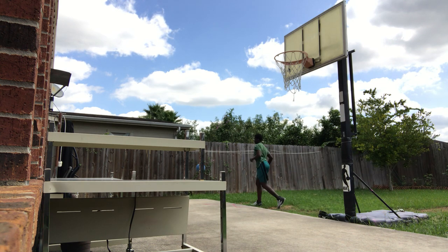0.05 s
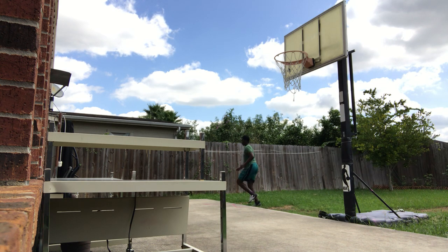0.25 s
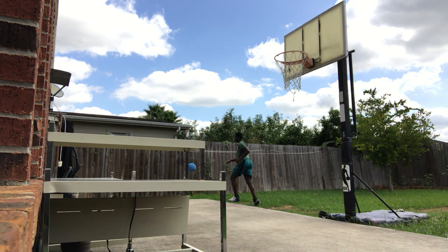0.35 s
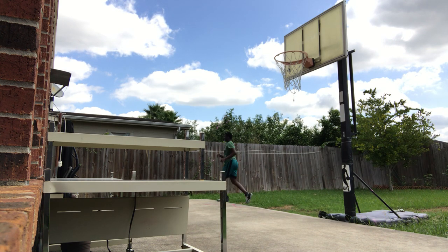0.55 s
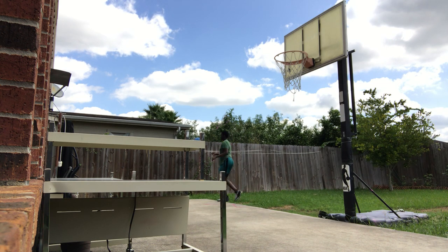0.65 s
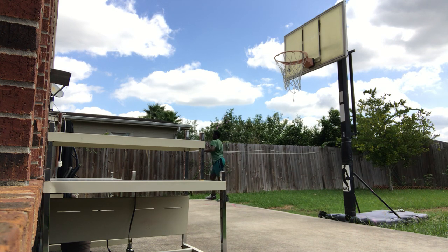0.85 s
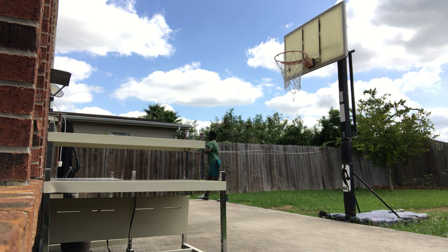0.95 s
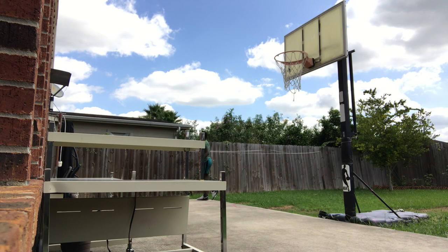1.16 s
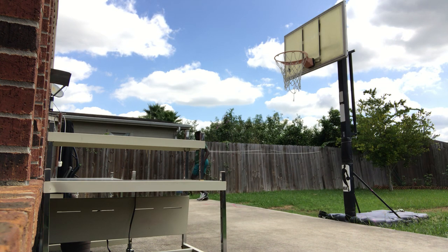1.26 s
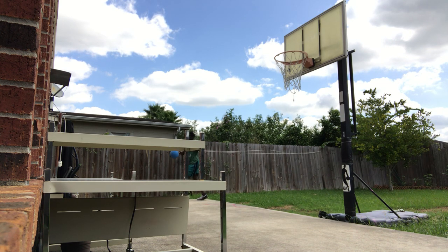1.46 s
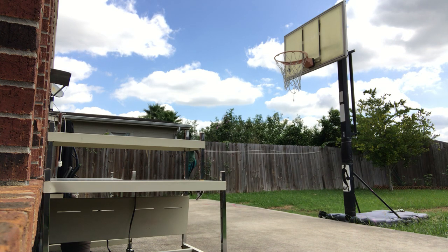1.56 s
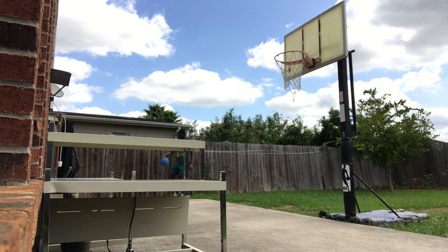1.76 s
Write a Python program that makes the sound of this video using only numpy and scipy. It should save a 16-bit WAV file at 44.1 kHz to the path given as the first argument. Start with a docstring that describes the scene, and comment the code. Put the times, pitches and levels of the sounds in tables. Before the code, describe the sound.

Some metres away in a backyard, a basketball hits concrete twice, about a second apart, echoing briefly off house and fence. The second bounce is duller. Faint shoe and hand taps follow each, while a distant engine hums.

```python
"""A concrete backyard court, one microphone some metres from a basketball that is dribbled twice.
A shoe scuffs, then at 0.25 s the ball lands: a sharp slap, a low thump and a short ring of the air
inside, thrown back by house and fence. Shoes and hands tap and scuff faintly and a thin metallic ring
lingers. The second, duller bounce comes at 1.27 s, followed by a few more taps. All the while, far
off, an engine slowly speeds up and an insect buzzes over the rumble of the neighbourhood."""
import sys
import numpy as np
from scipy import signal
from scipy.fft import rfft, irfft
from scipy.io import wavfile

SR = 44100
rng = np.random.default_rng(int(sys.argv[2]) if len(sys.argv) > 2 else 0)


def file_out(sig):
    """Save sig as 16-bit WAV at sys.argv[1]."""
    # one column per channel
    cols = np.atleast_2d(sig).T
    # limit, then scale
    lim = np.clip(cols, -1, 1)
    pcm = np.round(lim * 32767).astype(np.int16)
    wavfile.write(sys.argv[1], SR, pcm)


N = 79380
T = np.arange(N) / SR
HZ = np.fft.rfftfreq(N, 1 / SR)


# The ball landing, some metres off (time [s], slap [dB], push [dB], thump [dB], thump pitch [ratio],
# thump tilt [dB/octave], treble tilt [dB/octave], ring [dB], yard [dB], fence echo [dB])
BALL_BOUNCES = [(0.2468, -1, -26.5, -2, 1.015, 5, 1.5, -9.5, 2.5, -2),
                (1.2704, 0.5, -12, -1.6, .993, -1, -9.5, -12.5, 2, 0)]
def bounce(s, slap_db, push_db, thump_db, pitch, tilt_db, treble_db, ring_db, yard_db, fence_db):
    """The ball slaps, pushes air, thumps and rings; walls and yard answer."""
    slap = amp(slap_db) * rubber_slap()
    thump = amp(thump_db) * ball_thump(pitch, tilt_db)
    direct = slap + amp(push_db) * air_push() + thump + amp(ring_db) * air_ring()
    reflected = wall_echoes(slap, thump, fence_db) + amp(yard_db) * (near_scatter() + yard_tail())
    colour = hollow_colour() + treble_db * octaves(4130, 6060)
    return late(through(direct + reflected, causal(colour)), s)


# Spectrum of rubber hitting concrete (frequency [Hz], level [dB])
SLAP_COLOUR = [(60, 2.5), (400, 6), (800, -15.5), (1400, 3), (2500, 6), (3000, 3.5), (4300, -2.5),
               (5300, 2), (7000, -4), (9000, -16), (12500, -19.5), (16000, -35)]
# Modes of the rubber skin (frequency [Hz], level [dB], t60 [s])
SKIN_MODES = [(1534, -26, 0.015), (2450, -19.5, 0.0025), (5340, -18.5, 0.0043)]
def rubber_slap():
    """Rubber strikes concrete with a click, and the skin rings briefly."""
    click = through(signal.unit_impulse(N), causal(read(SLAP_COLOUR)))
    return skin_flex(click + sum(mode(*row) for row in SKIN_MODES))


# Bands the flexing skin delays (frequency [Hz], width [Hz])
FLEX_BANDS = [(2300, 2100), (5300, 7700), (10000, 4900)]
def skin_flex(x):
    """The flexing skin smears the slap in time; all-pass filters leave its spectrum's level alone."""
    for hz, width in FLEX_BANDS:
        radius = np.exp(-np.pi * width / SR)
        poles = np.array([1, -2 * radius * np.cos(2 * np.pi * hz / SR), radius * radius])
        x = signal.lfilter(poles[::-1], poles, x)
    return x


def air_push(length_s=0.01058, hz=204.9):
    """The flattening ball pushes out one short pulse of air."""
    window = (T < length_s) * np.sin(np.pi * T / length_s) ** 2
    return window * np.cos(2 * np.pi * hz * (T - length_s / 2))


# Low modes of the thump (frequency [Hz], level [dB], t60 [s])
THUMP_MODES = [(70.2, -34, 0.59), (103.75, -5.5, 0.089), (185.5, -9.5, 0.068), (222.6, -14.5, .15),
               (289.7, -7, 0.036), (378, -31, 0.1), (433.3, -31.5, 0.12), (538, -38, .1),
               (662, -26.5, 0.022)]
def ball_thump(pitch, tilt_db, rise_s=0.013):
    """Low modes of alternating sign swell and die, their levels tilted about the second mode."""
    pivot_hz = THUMP_MODES[1][0]
    modes = sum((-1) ** k * mode(hz * pitch, db + tilt_db * np.log2(hz / pivot_hz), t60)
                for k, (hz, db, t60) in enumerate(THUMP_MODES))
    return modes * (1 - np.exp(-T / rise_s))


# Modes of the air in the ball (frequency [Hz], level [dB], t60 [s])
CAVITY_MODES = [(957, -33.5, 0.18), (1055, -36, 0.31), (1142, -30, .22), (1288, -37.5, 0.28),
                (1353, -32, 0.21), (1428, -41.5, 0.62), (1558, -39.5, 0.24), (1872, -35, 0.27),
                (2000, -59, 0.18), (2170, -43, .33), (2336, -36, 0.26), (2432, -29.5, 0.18),
                (2720, -48, 0.22)]
def air_ring():
    """The enclosed air rings after the blow, its modes alternating in sign by pairs."""
    return sum((-1) ** (k // 2) * mode(*row) for k, row in enumerate(CAVITY_MODES))


# Peaks and dips of the ball (frequency [Hz], width [Hz], gain [dB])
HOLLOW_BANDS = [(513, 52, 1), (820, 180, -5.5), (1003, 160, 3.5), (1240, 42, -9), (1367, 120, 6.5),
                (2480, 390, 1.5), (2850, 84, -7.5)]
def hollow_colour():
    """The ball's hollow colour in dB, heard in the direct sound and all its reflections."""
    return sum(db / (1 + (2 * (HZ - hz) / width) ** 2) for hz, width, db in HOLLOW_BANDS)


# Reflections reaching the microphone (delay [s], slap level [dB], thump level [dB])
WALL_ECHOES = [(.0018, -10.5, -46), (.0061, -31, -4.5), (0.011, -18, -24), (.0269, -18, -17.5),
               (.0343, -15.5, -15.5), (.0788, -21, -24.5), (.1012, -22.5, -28), (.1112, -32, -42),
               (.1257, -26, -27), (.1542, -38, -29.5), (.2343, -45, -29)]
def wall_echoes(slap, thump, fence_db, dull_hz=5500, fence_after_s=.06):
    """Ground, house and, later, the fence throw back the thump and a dulled slap."""
    dull = through(slap, causal(-10 * np.log10(1 + (HZ / dull_hz) ** 2)))
    return sum(late(amp(slap_db + fence_db * (delay > fence_after_s)) * dull + amp(low_db) * thump, delay)
               for delay, slap_db, low_db in WALL_ECHOES)


# Spectrum of the near scatter (frequency [Hz], level [dB])
SCATTER_COLOUR = [(60, -15.5), (250, 15.5), (420, 11), (800, 8.5), (1400, 2), (2400, 0.5), (3600, -9),
                  (5800, -5), (9000, -17.5), (16000, -28)]
def near_scatter():
    """Nearby surfaces scatter a quick, dense burst that dies evenly at all frequencies."""
    return diffuse(SCATTER_COLOUR, t60s=[(1, 0.13)], rise_s=0.00063)


# Spectrum of the yard's reverberation (frequency [Hz], level [dB])
YARD_COLOUR = [(30, -2), (80, 13), (160, 17), (300, 10), (450, -3.5), (800, -7.5), (1400, -6), (2400, -3.5),
               (3600, -10), (6200, -11), (8500, -23.5), (16000, -32.5)]
# Its decay (frequency [Hz], t60 [s])
YARD_DECAY = [(80, 1), (250, 0.38), (1500, 0.56), (5500, 0.57), (10000, 0.5), (16000, 0.29)]
def yard_tail():
    """The whole yard answers with a longer tail, the bass lasting longest."""
    return diffuse(YARD_COLOUR, YARD_DECAY, rise_s=.012)


# Shoe and hand contacts (time [s], grit [dB], decay [s], tilt [dB/octave], knock [Hz], thud [dB])
PLAYER_TAPS = [(0.485, -45, 0.0082, 1, 5335, -41.5), (0.498, -46, 0.032, -2, 1650, -44.5),
               (0.767, -62, 0.0027, 20, 5850, -52.5), (0.994, -52, 0.0027, 5, 4330, -58),
               (1.008, -58.5, 0.0066, 3, 4660, -81), (1.052, -55.5, 0.013, 1.5, 2470, -74),
               (1.069, -59, 0.015, 1.5, 4600, -71), (1.408, -62, 0.014, -9, 1990, -38.5),
               (1.444, -48.5, 0.02, -0.5, 2000, -49), (1.462, -44, 0.03, -1, 1240, -47.5)]
# Spectrum of their grit (frequency [Hz], level [dB])
GRIT_COLOUR = [(150, 22), (500, 7), (900, 9), (1500, 4.5), (3200, 3), (5500, -4.5), (8000, -7),
               (13000, -9.5), (16000, -11)]
def tap(s, db, decay_s, tilt_db, knock_hz, thud_db):
    """A shoe or hand makes a short gritty contact with one resonance, over a soft thud."""
    knock_db, knock_octaves = 8.5, .25
    thud_hz, thud_s, rise_s = 125.4, 0.048, 0.00071
    knock = knock_db / (1 + (np.log2((HZ + 1) / knock_hz) / knock_octaves) ** 2)
    colour = read(GRIT_COLOUR) + knock + tilt_db * octaves(290, 9900)
    grit = amp(db) * noise(colour) * np.exp(-T / decay_s)
    thud = amp(thud_db) * np.sin(2 * np.pi * thud_hz * T) * np.exp(-T / thud_s)
    return late((grit + thud) * (1 - np.exp(-T / rise_s)), s)


# Shoe strokes on the court (time [s], length [s], level [dB], tilt [dB/octave])
SHOE_SCUFFS = [(-.03, 0.21, -63, 4), (0.914, 0.17, -58.5, -3.5), (1.073, .12, -66.5, 1),
               (1.495, .15, -70, 2)]
# Spectrum of the brushing sole (frequency [Hz], level [dB])
SOLE_COLOUR = [(200, 9.5), (420, 20.5), (760, 0.5), (1200, 8.5), (2000, -0.5), (6000, -9), (9000, -11.5),
               (13000, -12.5), (16000, -16)]
def scuff(start, length, db, tilt_db, edge_s=0.052):
    """A shoe brushes over grass and concrete with a grainy hiss."""
    stroke = np.clip(np.minimum(T - start, start + length - T) / edge_s, 0, 1)
    grain = amp(1.35 * noise(-40 * np.log10(1 + HZ / 150)))
    return amp(db) * stroke * grain * noise(read(SOLE_COLOUR) + tilt_db * octaves(260, 12000))


# Faint metallic tones (frequency [Hz], level [dB])
TINKLE_TONES = [(3036, -78), (3760, -84.5), (4705, -82)]
def tinkle(start_s=.52, rise_s=.04, hold_s=.21, decay_s=.04):
    """A thin, wavering metallic ring lingers after the first bounce."""
    level = np.minimum(T / rise_s, 1) * np.exp(-np.maximum(T - hold_s, 0) / decay_s)
    tones = sum(amp(db) * np.sin(2 * np.pi * hz * T) * (1 + .45 * drift(60)) for hz, db in TINKLE_TONES)
    return late(level * tones, start_s)


# An engine far from the yard (time [s], firing rate [Hz], level [dB])
ENGINE_RUN = [(0, 130, -51.5), (0.141, 122.4, -54.5), (.2, 123.2, -61), (0.549, 126.7, -50),
              (0.659, 129.4, -51.5), (.79, 138.2, -50), (0.921, 136.5, -49.5), (1.04, 138.4, -56),
              (1.131, 142.9, -47.5), (1.22, 142.2, -59), (1.601, 150, -59), (1.8, 153.4, -65.5)]
def engine(octave_db=-21, waver=.17):
    """At this distance an engine is just its wavering firing note and the octave above."""
    s, hz, db = np.transpose(ENGINE_RUN)
    phase = 2 * np.pi * np.cumsum(np.interp(T, s, hz)) / SR
    note = unit(np.sin(phase) + amp(octave_db) * np.sin(2 * phase))
    return amp(np.interp(T, s, db)) * (1 + waver * drift(20)) * note


def insect(hz=11300, width_hz=180, pulse_hz=71.5, pulse_share=.15, db=-86):
    """A distant insect sounds a narrow high band in short rapid pulses."""
    pulses = .5 + np.exp(-((T * pulse_hz % 1 - .5) / pulse_share) ** 2)
    band = noise(-20 * np.log10(1 + ((HZ - hz) / width_hz) ** 2))
    return amp(db) * unit(band * pulses)


# Open-air ambience at the microphone (frequency [Hz], level [dB])
AMBIENCE_COLOUR = [(20, -34), (42, 9.5), (85, 6.5), (130, -4), (240, -5.5), (350, -17), (700, -22),
                   (1400, -24.5), (2500, -31), (6000, -36), (10200, -41.5), (15500, -39), (16200, -58)]
def ambience(db=-54.5, swell_db=.7):
    """Neighbourhood rumble and hiss, slightly uneven in level."""
    return amp(db) * amp(swell_db * drift(50)) * noise(read(AMBIENCE_COLOUR))


def diffuse(colour, t60s, rise_s, clump_db=1.5):
    """Clumped diffuse reflections that swell, then die band by band."""
    clumps = amp(clump_db * noise(read([(5, -40), (40, 0), (200, 0), (900, -40)])))
    hz, t, bands = signal.stft(clumps * rng.choice([-1., 1.], N), SR, nperseg=256)
    t60 = read(t60s, hz)[:, None]
    dying = signal.istft(bands * amp(-60 * t / t60), SR, nperseg=256)[1][:N]
    tail = unit(dying * (1 - np.exp(-T / rise_s))) / np.sqrt(N)
    return through(tail, causal(read(colour)))


def mode(hz, db, t60):
    """One dying partial."""
    return amp(db) * np.exp(-np.log(1000) * T / t60) * np.sin(2 * np.pi * hz * T)


def amp(db):
    """Decibels to gain."""
    return 10 ** (np.asarray(db) / 20)


def unit(x):
    """Scales to rms 1."""
    return x / np.sqrt(np.mean(x ** 2) + 1e-20)


def read(points, hz=HZ):
    """Reads a curve on a log-frequency axis."""
    f, value = np.transpose(points)
    return np.interp(np.log(hz + 1), np.log(f + 1), value)


def octaves(lo_hz, hi_hz):
    """Octaves above lo_hz, held beyond both ends."""
    return np.log2(np.clip(HZ, lo_hz, hi_hz) / lo_hz)


def causal(db):
    """Minimum-phase impulse response with the given spectrum."""
    cepstrum = irfft(np.log(amp(db)), N)
    cepstrum[1:N // 2] *= 2
    cepstrum[N // 2 + 1:] = 0
    return irfft(np.exp(rfft(cepstrum)), N)[:4096]


def noise(db):
    """Noise of rms 1 with the given spectrum."""
    return unit(irfft(rfft(rng.standard_normal(N)) * amp(db), N))


def drift(corner_hz):
    """Slow random motion of rms 1."""
    return noise(-60 * np.log10(1 + HZ / corner_hz))


def through(x, response):
    """Convolves and cuts to length."""
    return signal.fftconvolve(x, response)[:N]


def late(x, s):
    """Delays by s seconds."""
    return np.r_[np.zeros(max(round(s * SR), 0)), x][:N]


def scene(tap_yard_db=-22.5):
    """Ball, player and background as they reach the microphone, in mono."""
    taps = sum(tap(*row) for row in PLAYER_TAPS)
    taps = taps + amp(tap_yard_db) * through(taps, yard_tail())
    ball = sum(bounce(*row) for row in BALL_BOUNCES)
    scuffs = sum(scuff(*row) for row in SHOE_SCUFFS)
    return (ball + taps + scuffs + tinkle() + engine() + insect() + ambience())[None]


def record(dry, low_cut_hz=48, top_hz=16200):
    """The microphone's bass roll-off and the recorder's band limit."""
    low_cut = signal.butter(4, low_cut_hz, "high", fs=SR, output="sos")
    band_limit = signal.firwin(511, top_hz, window=("kaiser", 9), fs=SR)
    return signal.oaconvolve(signal.sosfilt(low_cut, dry), band_limit[None], "same")


dry = scene()
out = record(dry)
file_out(out)
```